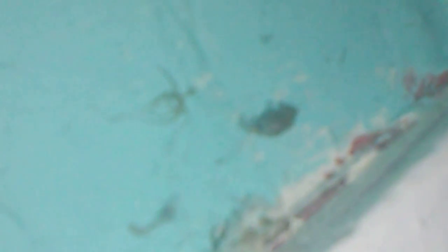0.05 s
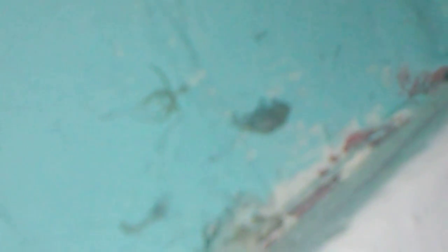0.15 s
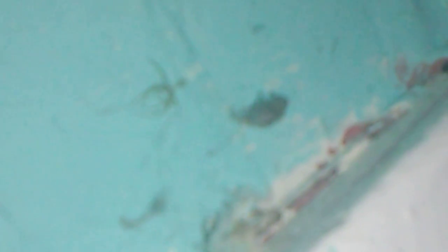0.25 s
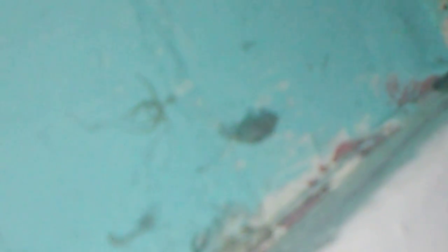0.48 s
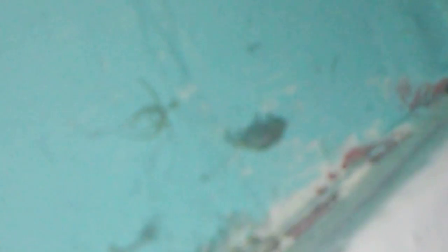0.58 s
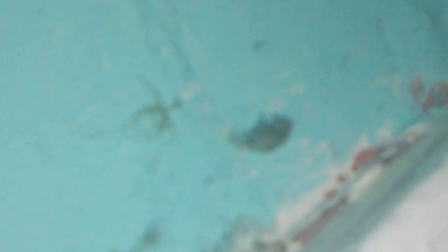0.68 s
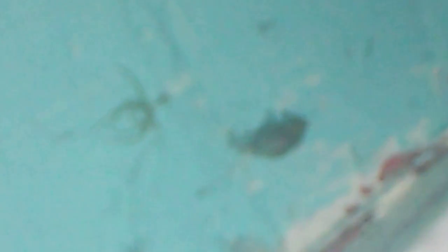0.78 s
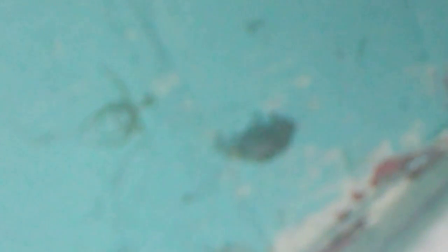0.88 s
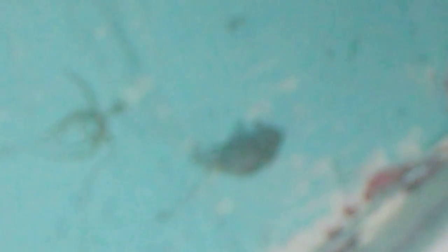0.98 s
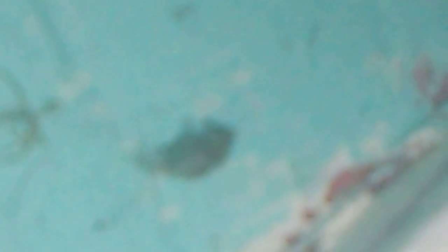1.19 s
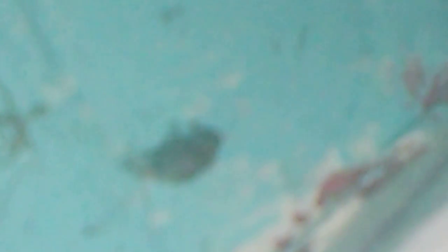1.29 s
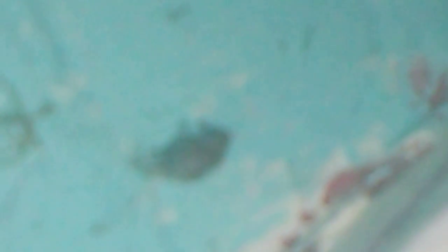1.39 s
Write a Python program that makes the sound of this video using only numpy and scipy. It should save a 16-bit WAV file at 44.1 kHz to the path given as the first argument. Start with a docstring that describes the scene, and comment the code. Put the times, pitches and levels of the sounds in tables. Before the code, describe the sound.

A single thump from handling the microphone, then thin hiss over a faint hum.

```python
"""A motor hums in a quiet, faintly rumbling background, and a small camera's lens drive whines softly.
At about 0.25 s a hand rubs on the casing and bumps the left microphone: the casing slips in a quick
run of dry snaps and rebounds from the hardest with one thump. The rubbing trails off as a short rustle.
A thin hiss stays on that side, loses its lower part by about 0.43 s, and slowly fades."""
import sys
import numpy as np
from scipy import signal
from scipy.fft import rfft, irfft
from scipy.io import wavfile

SR = 44100
rng = np.random.default_rng(int(sys.argv[2]) if len(sys.argv) > 2 else 0)


def store_wav(level_fs):
    """Save 16-bit WAV to argv[1]."""
    pcm = np.round(np.clip(np.atleast_2d(level_fs), -1, 1) * 32767)
    wavfile.write(sys.argv[1], SR, pcm.T.astype(np.int16))


N = 63945
T = np.arange(N) / SR
HZ = np.maximum(np.arange(N // 2 + 1) * SR / N, 1)

# background spectrum at each microphone: (frequency [Hz], relative density [dB])
AIR_LEFT_SPECTRUM = [(25, -4), (80, -17.5), (125, 8.5), (160, -4.5), (220, 3), (270, -5.5), (340, 1.5),
                     (430, -12), (500, -5), (750, -25), (1200, -18.5), (1800, -26.5), (2400, -26),
                     (3200, -26.5), (5200, -37), (7000, -39.5), (14000, -42.5)]
AIR_RIGHT_SPECTRUM = [(25, -6.5), (80, -16), (125, 7.5), (160, -4.5), (220, 1), (270, -4), (340, -2.5),
                      (420, -11), (520, -9), (800, -8.5), (1200, -18.5), (1600, -24.5), (2300, -25.5),
                      (4000, -34.5), (9000, -40.5), (14000, -39)]
# likeness of the left and right background: (frequency [Hz], correlation [0-1])
AIR_CORRELATION = [(30, 1), (220, 1), (400, 0.88), (800, 0.15), (2000, 0.057), (10000, .02)]
# background swells: (time [s], width [s], centre [Hz], width [octaves], left [dB], right [dB])
SWELL_BANDS = [(0.065, 0.014, 1780, 0.61, -74, -66), (.48, .045, 2700, 0.79, -84, -68),
               (0.593, .008, 1090, 0.66, -58.5, -63), (0.697, 0.014, 204, 0.097, -49, -58),
               (0.879, 0.014, 389, 0.13, -58, -64), (0.952, 0.0099, 480, 0.074, -64, -53),
               (0.996, 0.017, 499, 0.065, -55.5, -66), (1.086, 0.028, 970, 0.26, -67, -60),
               (1.165, 0.023, 505, 0.074, -57, -59.5)]
# harmonics of the motor: (harmonic number, level [dB])
MOTOR_HARMONICS = [(1, -49.5), (2, -55), (3, -64), (4, -66.5), (6, -66.5)]
# casing resonances excited by the lens drive: (frequency [Hz], half-width [Hz], relative level [dB])
WHINE_RESONANCES = [(1180, 88, -5), (1420, 120, -9), (1778, 30, -7.5), (2020, 79, -11), (2316, 116, -3.5),
                    (4870, 82, -15.5), (5320, 210, -14)]
# envelope of the whine: (time [s], level [dB])
WHINE_ENVELOPE = [(0, -66.5), (.22, -67), (.6, -75.5), (.95, -76), (1.25, -72), (1.35, -64.5), (1.45, -68)]
# spectrum of the faint hiss that reaches below the edge: (frequency [Hz], relative density [dB])
FAINT_HISS_SPECTRUM = [(3000, -12), (5000, 2), (5900, 0), (6400, 3), (7400, -1.5), (9000, -6), (14000, -5)]
# its envelope: (time [s], level [dB])
FAINT_HISS_ENVELOPE = [(.25, -93), (.33, -71), (.42, -69), (.58, -64), (.64, -73), (1.1, -69),
                       (1.45, -70.5)]
# spectrum of the main hiss: (frequency [Hz], relative density [dB])
HISS_SPECTRUM = [(4800, -3), (5500, 0), (6200, -6), (8100, 3), (9500, -1.5), (11500, -7), (14200, -10.5)]
# its envelope before filtering: (time [s], level [dB])
HISS_ENVELOPE = [(.252, -94), (.268, -47.5), (.34, -50), (.45, -54), (.8, -53.5), (1.1, -54.5), (1.45, -59)]
# its lower edge: (time [s], frequency [Hz])
HISS_LOWER_EDGE = [(.34, 4300), (.36, 4800), (.41, 5100), (.43, 7600), (.6, 7500), (.65, 7660),
                   (1.45, 7580)]
# friction spectrum of the hand on the casing: (frequency [Hz], relative density [dB])
RUB_SPECTRUM = [(60, -13), (200, -1.5), (450, 0.5), (900, -5.5), (1600, -11.5), (2500, -13), (4000, -17),
                (7000, -24.5), (10000, -31), (14000, -53)]
# envelope of the rubbing: (time [s], level [dB])
RUB_ENVELOPE = [(.228, -68), (.238, -49.5), (.242, -48), (.248, -38.5), (.258, -35.5), (.279, -32),
                (.287, -41.5), (.305, -47), (.342, -46.5), (.352, -52.5), (.41, -68), (.5, -95)]
# casing modes that ring after the thump: (frequency [Hz], level [dB], 60 dB decay time [s])
CASING_MODES = [(409, -42, 0.11), (509, -40, 0.22), (628, -46, .1)]
# slips of the casing, ahead of the microphone port: (time [s], peak level [dB], contact width [s])
SNAP_PULSES = [(.24968, -11.5, 5.5e-5), (.25553, -12.5, 4.5e-5), (.2571, -11.5, 5e-5), (.25753, -7.5, 5e-5),
               (.25791, 4, 5.8e-5), (.26063, -18, 4.5e-5), (.2627, -16.5, 5e-5), (.26526, -21, 4e-5),
               (.2671, -11.5, 6e-5), (.26857, -21, 1.2e-4), (.27993, -13.5, 5e-5)]


def from_db(db):
    """Convert decibels to an amplitude ratio."""
    return 10 ** (np.asarray(db) / 20)


def unit_power(x):
    """Normalise to a mean square of one."""
    return x / np.sqrt(np.mean(x ** 2) + 1e-20)


def in_time(points, t=T):
    """Interpolate a curve linearly in time."""
    return np.interp(t, *np.transpose(points))


def in_frequency(points):
    """Interpolate a curve on a logarithmic frequency axis."""
    hz, values = np.transpose(points)
    return np.interp(np.log(HZ), np.log(hz), values)


def shaped(x, gain):
    """Filter by multiplying the spectrum; the result has unit power."""
    return unit_power(irfft(rfft(x) * gain, N))


def noise(gain):
    """Filtered white noise takes on the filter's spectrum."""
    return shaped(rng.standard_normal(N), gain)


def drift(rate_hz):
    """Low-pass noise gives a random fluctuation of unit variance."""
    return noise((HZ > 1) / (1 + (HZ / rate_hz) ** 2))


def air():
    """Partial coherence: the rumble is alike on both sides in the bass; its midrange flickers."""
    correlation = in_frequency(AIR_CORRELATION)
    shared = rfft(rng.standard_normal(N))
    flicker = from_db(1.4 * drift(rate_hz=23))
    midrange = np.exp(-np.log2(HZ / 600) ** 2)
    sides = []
    for spectrum, db in ((AIR_LEFT_SPECTRUM, -56), (AIR_RIGHT_SPECTRUM, -55.5)):
        own = rfft(rng.standard_normal(N))
        white = irfft(np.sqrt(correlation) * shared + np.sqrt(1 - correlation) * own, N)
        rumble = from_db(db) * shaped(white, from_db(in_frequency(spectrum)))
        sides.append(rumble + irfft(rfft(rumble) * midrange, N) * (flicker - 1))
    return np.array(sides)


def swells():
    """Band-limited noise swells briefly; the narrower the band, the clearer its pitch."""
    out = np.zeros((2, N))
    for time, width_s, hz, octaves, left_db, right_db in SWELL_BANDS:
        band = np.exp(-.5 * (np.log2(HZ / hz) / octaves) ** 2)
        envelope = np.exp(-.5 * ((T - time) / width_s) ** 2)
        for side, db in enumerate((left_db, right_db)):
            out[side] += from_db(db) * envelope * noise(band)
    return out


def motor_hum(fundamental_hz=56.95, waver=.0042):
    """Periodic motion gives a harmonic series, which wavers with the motor's speed."""
    phase = 2 * np.pi * np.cumsum(fundamental_hz * (1 + waver * drift(rate_hz=4.4))) / SR
    return sum(np.sqrt(2) * from_db(db) * np.sin(k * phase + rng.uniform(0, 2 * np.pi))
               for k, db in MOTOR_HARMONICS)


def lens_whine():
    """Forced vibration: the lens drive's noise excites narrow resonances of the casing."""
    resonances = sum(from_db(db) * noise(1 / (1 + ((HZ - hz) / half_width) ** 2))
                     for hz, half_width, db in WHINE_RESONANCES)
    return from_db(in_time(WHINE_ENVELOPE)) * resonances


def faint_hiss():
    """Broadband noise keeps a weak band sounding below the edge of the main hiss."""
    return from_db(in_time(FAINT_HISS_ENVELOPE)) * noise(from_db(in_frequency(FAINT_HISS_SPECTRUM)))


def hiss(edge_width_hz=91, leak_db=-15.5, dull_from_s=.7, dull_db_per_s=7.5, dull_above_hz=8500):
    """Time-varying filtering: the lower edge of a high hiss climbs, and later its top fades."""
    hz, t, spectra = signal.stft(noise(from_db(in_frequency(HISS_SPECTRUM))), SR, nperseg=512)
    hz = hz[:, None]
    above_edge = .5 + .5 * np.tanh((hz - in_time(HISS_LOWER_EDGE, t)) / (2 * edge_width_hz))
    top = .5 + .5 * np.tanh((hz - dull_above_hz) / 400)
    loss_db = dull_db_per_s * np.maximum(t - dull_from_s, 0) * top
    gain = (above_edge + from_db(leak_db)) * from_db(-loss_db)
    return from_db(in_time(HISS_ENVELOPE)) * signal.istft(spectra * gain, SR)[1][:N]


def hand_rub(roughness_db=2):
    """Sliding friction makes noise; fast random amplitude modulation makes it rough."""
    grain = unit_power(from_db(roughness_db * drift(rate_hz=200)))
    return from_db(in_time(RUB_ENVELOPE)) * grain * noise(from_db(in_frequency(RUB_SPECTRUM)))


def casing_thump(start_s=.2581):
    """Damped free vibration: the casing rebounds in one heavy swing, then rings faintly."""
    age = np.maximum(T - start_s, 0)

    def mode(hz, db, t60_s):
        return from_db(db) * np.sin(2 * np.pi * hz * age) * from_db(-60 * age / t60_s)

    return mode(hz=410, db=-7.5, t60_s=.0055) + sum(mode(*row) for row in CASING_MODES)


def casing_snaps():
    """Impulsive excitation: each slip of the casing is a one-sided pressure pulse."""
    return sum(-from_db(db) * np.exp(-.5 * ((T - time) / width) ** 2) for time, db, width in SNAP_PULSES)


def microphone_port(pressure, cutoff_hz=117):
    """The port acts as a high-pass filter and attenuates deep bass."""
    return signal.sosfilt(signal.butter(2, cutoff_hz, "high", fs=SR, output="sos"), pressure + 1e-18)


def scene():
    """Superposition: the background reaches both microphones; bump, hiss and whine only the left."""
    out = air() + motor_hum() + swells()
    bump = microphone_port(casing_snaps() + casing_thump()) + hand_rub()
    out[0] += bump + hiss() + faint_hiss() + lens_whine()
    return out


def record(dry, ceiling=.82, knee=6, cutoff_hz=14200):
    """Saturation: the hardest snap overloads the microphone; a steep low-pass then cuts the top."""
    saturated = dry / (1 + np.abs(dry / ceiling) ** knee) ** (1 / knee)
    return irfft(rfft(saturated) / np.sqrt(1 + (HZ / cutoff_hz) ** 300), N)


dry = scene()
out = record(dry)
store_wav(out)
```